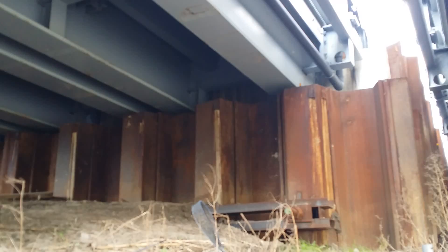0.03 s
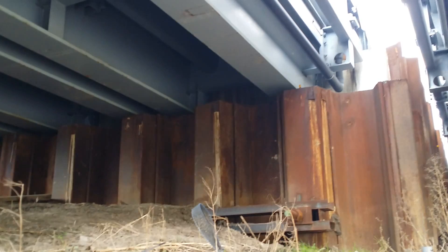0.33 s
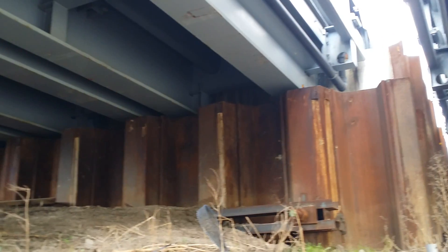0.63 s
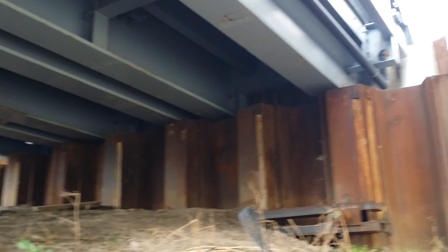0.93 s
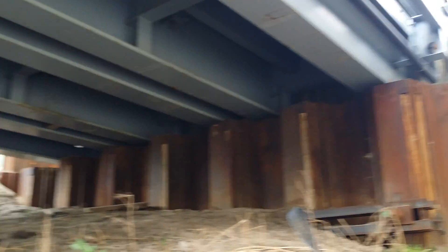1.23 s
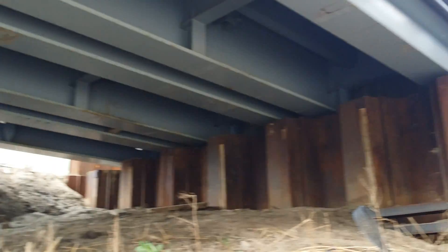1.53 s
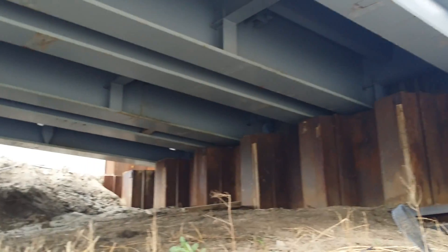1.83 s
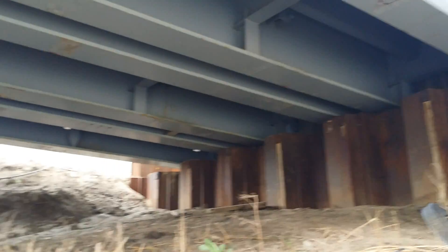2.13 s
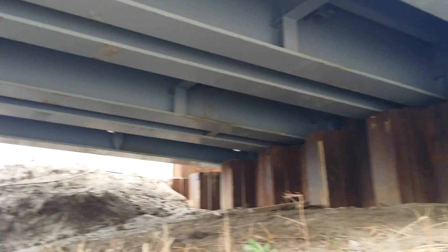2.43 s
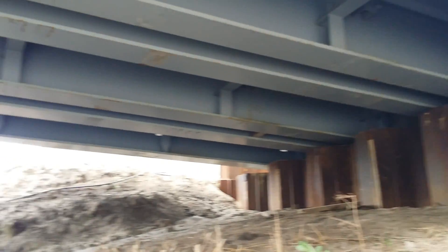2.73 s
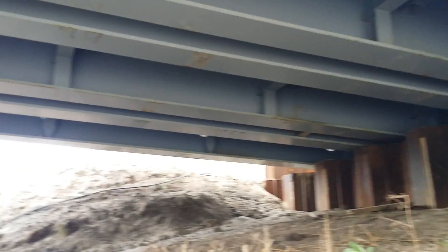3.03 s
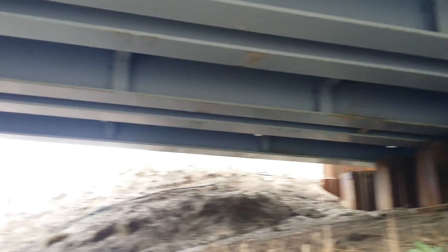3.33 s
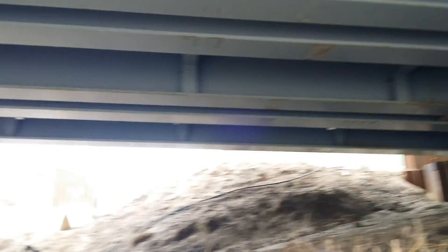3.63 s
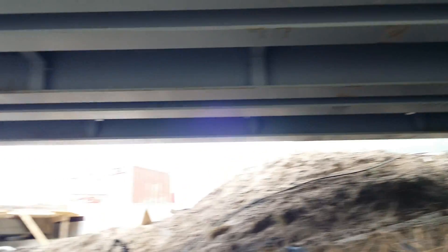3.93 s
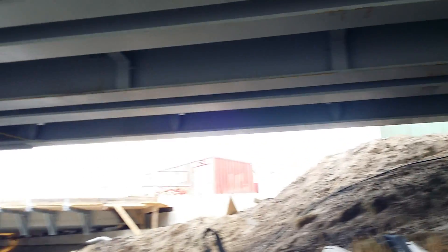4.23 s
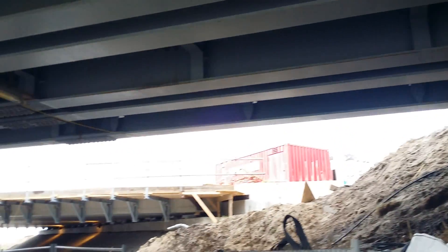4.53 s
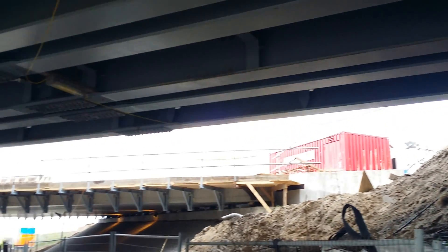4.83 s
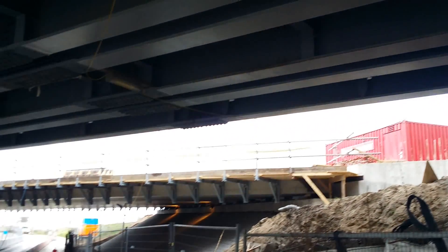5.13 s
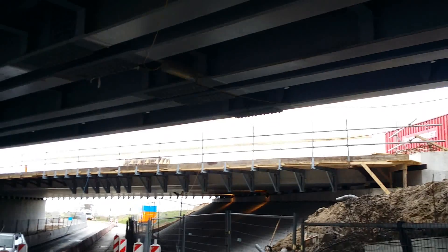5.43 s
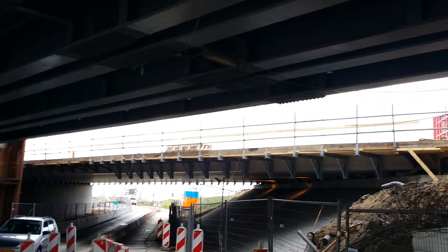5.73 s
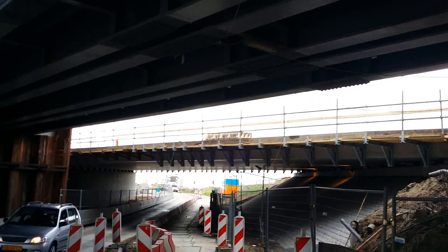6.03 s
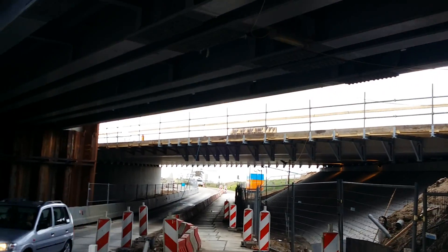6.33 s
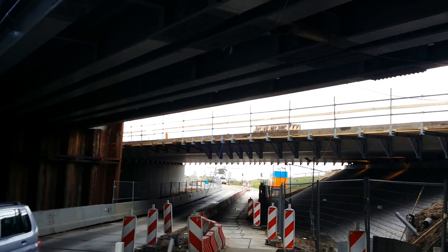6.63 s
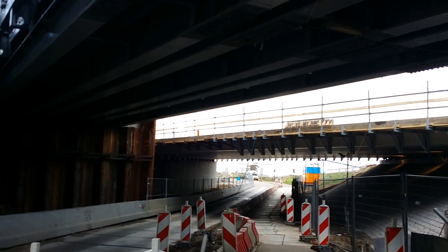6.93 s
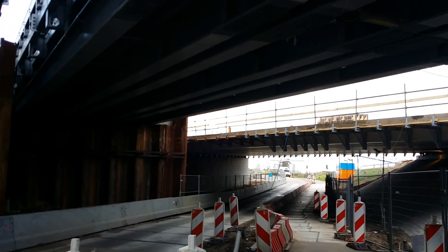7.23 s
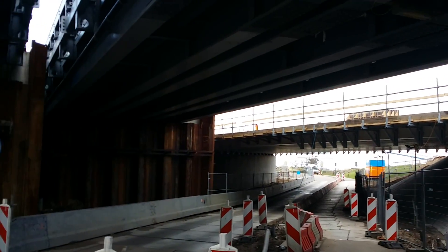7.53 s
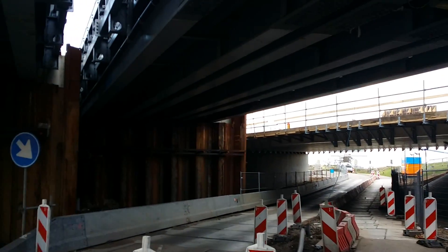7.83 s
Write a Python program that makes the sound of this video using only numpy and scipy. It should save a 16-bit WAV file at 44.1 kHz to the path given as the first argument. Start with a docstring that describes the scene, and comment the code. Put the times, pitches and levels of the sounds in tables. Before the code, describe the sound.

Heard outdoors from under a steel bridge, vehicles roll overhead with a low boom and roar that dies away. In the lull there is distant traffic on the left, a couple of taps on the microphone and puffs of wind. A second wave arrives with a ringing rattle from the bridge joint. Then a car passes close by on the road below, tyres hissing and humming, clanking over a loose steel plate with front and rear wheels.

```python
"""Under a steel road bridge

Overhead, vehicles roll across in two waves with a lull between; the deck booms and roars and its joint rattles.
A car passes about 7 m away on the gritty road below and clanks over a loose steel plate, front axle then rear,
and the underpass rings. In the lull a far road is heard off to the right, wind puffs at the two microphone
ports, something taps the housing and a few small things tick close by."""
import sys
import numpy as np
from scipy import signal
from scipy.fft import rfft, irfft, next_fast_len
from scipy.io import wavfile
from scipy.ndimage import uniform_filter1d, minimum_filter1d

SR = 44100
rng = np.random.default_rng(int(sys.argv[2]) if len(sys.argv) > 2 else 0)


def wav_record(signal):
    """Record a signal, one row per channel, as 16-bit PCM in the file named by sys.argv[1]."""
    frames = np.transpose(np.atleast_2d(signal))
    bounded = np.clip(frames, -1, 1)
    # unit amplitude maps onto the largest positive 16-bit level
    quanta = np.round(bounded * 32767).astype(np.int16)
    wavfile.write(sys.argv[1], SR, quanta)


N = 355887
TIME = np.arange(N) / SR
FFT_SIZE = next_fast_len(N, real=True)
FREQ = np.maximum(np.arange(FFT_SIZE // 2 + 1) * SR / FFT_SIZE, 1)

# The deck's spectrum, heard from underneath: frequency_hz, relative_db
DECK_SPECTRUM = [(16, -57), (28, -20), (40, -14.5), (60, -14.5), (81, -11.5), (102, -2.5), (134, -0.5),
                 (183, 0), (316, -4.5), (408, -3), (558, -1), (1060, -1.5), (1270, -2.5), (1740, -9),
                 (2420, -28), (3000, -30.5), (3900, -69), (6600, -120)]
# Girder resonances and the hollows between them: frequency_hz, width_hz, lift_db
GIRDER_RESONANCES = [(43.7, 15, 2), (95.2, 5.8, 8.5), (130.7, 13, 2.5), (154.3, 7, 2.5), (179, 12.5, -3.5),
                     (226, 10, 2), (279.2, 16.4, 5), (318, 33, 6.5), (380, 11, 2), (493, 260, -1.5),
                     (548, 9.3, 4.5), (1083, 20, 3.5), (2000, 690, 1.5)]
# Sound from the open end of the underpass reaches the left port first: frequency_hz, lead_rad
LEFT_PORT_LEAD = [(100, 0), (300, .12), (600, .3), (900, .35), (1200, 0)]
# Bands of girder boom, plate roar and tyre howl: low_hz, high_hz
DECK_BANDS = [(40, 180), (180, 600), (700, 2000)]

def deck(boom_db, roar_db, howl_db):
    """Rolling tyres shake the deck plates and the girders above the microphone."""
    lift_db = sum(db / (1 + (2 * (FREQ - hz) / width) ** 2) for hz, width, db in GIRDER_RESONANCES)
    steel = colour(DECK_SPECTRUM) * from_db(lift_db) * crowded_modes(spacing_hz=11, depth_db=1.16)
    lead = np.exp(1j * at_hz(LEFT_PORT_LEAD, FREQ) * np.array([[1], [0]]))
    pan_db = at_hz([(100, 0.5), (400, 0.5), (1100, -0.47), (2500, -2.0)], FREQ)
    heard = diffuse() * steel * lead * from_db([pan_db / 2, -pan_db / 2])
    jolts = from_db(.5 * drift(per_s=28))   # uneven plates jolt all bands at once
    levels_db = [boom_db, roar_db, howl_db]
    return jolts * follow_levels(heard, DECK_BANDS, levels_db, flutter_db=0.02, flutter_per_s=28)


# Traffic overhead: arrival_s, overhead_s, boom_db, roar_db, howl_db, hiss_db, spray_db
DECK_TRAFFIC = [(0.10, 1.09, -20, -19, -20, -41, -57.5), (1.14, 0.27, -40, -35, -39, -46, -60.5),
                (1.161, 0.98, -32, -15.5, -24.5, -47, -66), (4.532, 0.82, -20.5, -20.5, -18, -38.5, -58),
                (5.05, 0.42, -40, -22.5, -21.5, -58, -79), (5.48, 1.73, -27.5, -20, -21.5, -63.5, -83),
                (7.28, 1.24, -23, -19.5, -22, -51, -72)]
# The next four each list: boom, roar, howl, hiss, spray
ABUTMENT_LOSS_DB = [15, 11.5, 20.2, 18, 6.1]   # the abutment screens a vehicle until it is on the deck
ENTRY_RISE_S = [0.033, 0.21, 0.091, 0.033, 0.04]   # time to come clear of the abutment
ROLL_AWAY_DB_PER_S = [1.5, 0.2, 1.64, 5.2, 5.2]   # fall while still overhead
OFF_DECK_DB_PER_S = [4.7, 11.7, 35.5, 79, 120]   # the low steel rings on longest

def crossing_levels():
    """Boom, roar, howl, hiss and spray in dB: each vehicle nears, bursts onto the deck and rolls away."""
    stages = [ENTRY_RISE_S, ABUTMENT_LOSS_DB, ROLL_AWAY_DB_PER_S, OFF_DECK_DB_PER_S]
    rise_s, screened_db, sag, release = np.array(stages)[:, :, None]
    approach_db_per_s = 19.5
    steps, levels = TIME[::64], []
    for arrival_s, overhead_s, *full_db in DECK_TRAFFIC:
        age = steps - arrival_s
        nearing = approach_db_per_s * np.maximum(-age, 0) + screened_db * np.clip(1 - age / rise_s, 0, 1)
        leaving = sag * np.clip(age, 0, overhead_s) + release * np.maximum(age - overhead_s, 0)
        levels.append(np.array(full_db)[:, None] - nearing - leaving)
    return [np.interp(TIME, steps, level) for level in power_sum_db(*levels)]


# Heavy axles overhead: start_s, length_s, boom_db, roar_db
AXLE_LOADS = [(0.447, 0.78, -19, -23.5), (1.19, 0.24, -30, -23), (2.056, 0.22, -21, -46),
              (2.397, 0.49, -25.5, -32), (4.54, 0.16, -18, -28), (4.702, 0.38, -15, -40),
              (5.17, 0.14, -32, -40.5), (5.52, 0.29, -31, -24), (5.935, 0.4, -22, -33),
              (6.465, 0.14, -19, -36.5), (7.11, 0.22, -20, -38), (7.5, 0.12, -32, -35)]

def heave_levels(edge_s=0.086):
    """Extra boom and roar in dB while heavy axles make the girders heave."""
    swells = 0
    for start_s, length_s, *levels_db in AXLE_LOADS:
        inside_s = np.minimum(TIME - start_s, start_s + length_s - TIME)
        swells = swells + from_db(levels_db)[:, None] * np.clip(inside_s / edge_s, 0, 1)
    return 20 * np.log10(swells + 1e-9)


# Axles reach the deck's expansion joint, up and a little left: start_s, level_db
JOINT_AXLES = [(4.567, -30), (4.68, -31)]
# The joint's modes: pitch_hz, relative_db, t60_s
JOINT_MODES = [(1570, 2, .9), (1850, -2, .8), (1995, 0, .7), (2690, -6, .5), (3080, -7, .6),
               (3297, -4, 1.2), (3520, -11, .5), (3726, -14, .6), (4264, -12, .8), (4515, -10, .6),
               (4790, -15, .6), (5355, -13, .7)]

def expansion_joint(rattle_db=1.5, rattle_t60_s=1.6, rattle_hz=(1550, 2560), slap_db=6):
    """Soft tyres slap the joint and push it into ringing; its many small parts chatter on."""
    out, age = np.zeros((2, N)), TIME[:SR]
    for start_s, level_db in JOINT_AXLES:
        chatter = unit_rms(butter(rng.standard_normal((2, SR)), rattle_hz, "band"))
        rattle = chatter * from_db(rattle_db - 60 * age / rattle_t60_s)
        ringing = rattle + struck_steel(JOINT_MODES, scatter_db=1.5)
        add(out, start_s, from_db(level_db) * pan(2.9) * ringing * (1 - np.exp(-age / 0.012)))
        add(out, start_s, from_db(level_db + slap_db) * crack(hz=1300, t60_s=0.39, spread=1.53))
    return out


# Wheels on the loose plate in the road below:
# start_s, crack_db, crack_hz, spread_ratio, pan_db, clang_db, ring_db, ring_low_cut_hz
PLATE_HITS = [(6.303, -14, 5400, 1.24, 2.5, -12, -17.5, 1930), (6.475, -34, 8200, 1.3, -2, -45, -46, 4500),
              (6.490, -31, 4800, 1.3, 2, -38, -21.5, 2800), (6.510, -17.5, 5500, 1.65, 1, -16, -19, 1970),
              (6.646, -22, 7940, 1.3, -5, -30, -18, 4530), (6.666, -30, 10500, 1.4, -8, -40, -16, 3680),
              (6.853, -27, 8500, 1.7, 1, -27, -16.5, 3700), (6.890, -28, 7500, 1.3, -8, -34, -22, 3440)]
# The plate's clang, choked as the tyre presses it down: pitch_hz, relative_db, t60_s
CLANG_MODES = [(4080, -6, .03), (4880, -1, .025), (5520, 0, .03), (6350, -3, .035), (7700, -9, .04),
               (8950, -11, .04)]
# The plate's longer ring: pitch_hz, relative_db, t60_s
PLATE_MODES = [(3010, -4, .42), (4264, -1, .45), (5033, -3, .5), (5351, -2, .45), (5550, 0, .5),
               (5812, -1, .5), (6002, 0, .45), (6354, -1, .5), (6755, -3, .45), (7241, -4, .3),
               (8210, -5, .4), (8578, -5, .4), (9320, -2, .45), (9687, -6, .45), (11190, -10, .3),
               (12440, -11, .2)]
# The wash between the underpass walls: frequency_hz, relative_db
WASH_SPECTRUM = [(1500, 7.5), (3000, -5), (4300, -6), (6000, -5.5), (7000, -8), (9200, -7.5),
                 (10500, -12.5), (13000, -14.5), (15500, -26)]
# How long that wash lasts: frequency_hz, t60_s
WASH_DECAY = [(2000, 0.58), (5000, 0.81), (9000, 0.56), (14000, 0.37)]

def plate_clanks(modes_db=-21.5):
    """Each wheel slaps the plate: a crack, a short clang, ringing modes and a wash off the walls."""
    wash = diffuse() * colour(WASH_SPECTRUM) * crowded_modes(spacing_hz=30, depth_db=1.7)
    bands = list(octaves(wash / np.std(to_time(wash)), WASH_DECAY[0][0], WASH_DECAY[-1][0]))
    out, age = np.zeros((2, N)), TIME[:SR]
    for k, hit in enumerate(PLATE_HITS):
        start_s, crack_db, crack_hz, spread, pan_db, clang_db, ring_db, low_cut_hz = hit
        stretch = slice(k * SR // 2, k * SR // 2 + SR)
        tail = sum(band[:, stretch] * from_db(-60 * age / at_hz(WASH_DECAY, hz)) for hz, band in bands)
        modes = from_db(modes_db) * struck_steel(PLATE_MODES, scatter_db=2.5)
        ring = (tail + modes) * (1 - np.exp(-age / 0.0013))   # reflections build up
        add(out, start_s, from_db(ring_db) * butter(ring, low_cut_hz, "high", order=3))
        add(out, start_s, from_db(clang_db) * pan(pan_db) * struck_steel(CLANG_MODES, scatter_db=1.5))
        add(out, start_s, from_db(crack_db) * pan(pan_db) * crack(crack_hz, t60_s=.035, spread=spread))
    return out


# The tread note of the car below, a little to the right: time_s, level_db, pitch_hz
TREAD_NOTE = [(5.599, -67, 868.6), (6.28, -34, 869.5), (6.44, -18.5, 843.6), (6.6, -23.5, 784.5),
              (6.95, -18, 735), (7.251, -29, 720), (8.05, -26.5, 710.2)]

def tyre_sing(width_hz=204, rasp_db=-6, rasp_hz=(940, 1450)):
    """The tread pumps air in one resonance that sinks as the car goes by, with a rasp above it."""
    level_db, pitch_hz = in_time(TREAD_NOTE)
    air, centre_hz = diffuse(), np.mean(np.array(TREAD_NOTE)[:, 2])
    tread = air / np.hypot(1, (2 * (FREQ - centre_hz) / width_hz) ** 2)
    glide_rad = 2 * np.pi * np.cumsum(pitch_hz - centre_hz) / SR
    note = unit_rms(to_time(tread) * np.cos(glide_rad) + to_time(1j * tread) * np.sin(glide_rad))
    rasp = from_db(rasp_db) * unit_rms(butter(to_time(air), rasp_hz, "band", order=3))
    return from_db(level_db) * (TIME > TREAD_NOTE[0][0]) * pan(-1.8) * (note + rasp)


def car_nearness_db(lag_s, pass_s=6.98, speed_m_per_s=4.83, distance_m=6.94, fall_db_per_decade=33.5):
    """Level of the car below, relative to its closest point to the microphone."""
    along_m = speed_m_per_s * (TIME - pass_s - lag_s)
    return -fall_db_per_decade * np.log10(np.hypot(1, along_m / distance_m))


# Tyre hiss as it fills the underpass: frequency_hz, relative_db
HISS_SPECTRUM = [(1290, 4), (2200, -1), (3390, -7.5), (6020, -13.5), (7320, -20), (8560, -21),
                 (10400, -30.5), (14300, -39.5), (15600, -56)]
# Bands of tread hiss and spray: low_hz, high_hz
HISS_BANDS = [(2800, 7000), (9000, 15000)]

def tyre_hiss(deck_hiss_db, deck_spray_db, car_hiss_db=-39, car_spray_db=-53.5):
    """Tread noise and trailing spray from the deck and the car below, scattered by the steel walls."""
    heard = diffuse() * colour(HISS_SPECTRUM) * crowded_modes(spacing_hz=24.7, depth_db=0.8)
    hiss_db = power_sum_db(deck_hiss_db, car_hiss_db + car_nearness_db(lag_s=0))
    spray_db = power_sum_db(deck_spray_db, car_spray_db + car_nearness_db(lag_s=0.35))
    hiss = follow_levels(heard, HISS_BANDS, [hiss_db, spray_db], flutter_db=1.5, flutter_per_s=25)
    return pan(1.0) * hiss


def grit(peak_snaps_per_s=160, gain_db=-39, size_spread_db=4, band_hz=(6500, 13000)):
    """Tiny stones snap in the tread, most often just after the car passes; the walls scatter them."""
    nearness = from_db(car_nearness_db(lag_s=0.56))
    snapped = rng.random(N) < peak_snaps_per_s * nearness ** 2 / SR
    sizes = from_db(size_spread_db * np.minimum(rng.exponential(1, N), 4))
    scatter = rng.standard_normal((2, SR // 100)) * from_db(-60 * TIME[:SR // 100] / 0.009)
    snaps = signal.fftconvolve([snapped * sizes * nearness], scatter / np.std(scatter) / 10, axes=1)
    return from_db(gain_db) * butter(snaps[:, :N], band_hz, "band")


# Wind right on the microphone: start_s, length_s, level_db, top_hz, port (0 left, 1 right)
WIND_PUFFS = [(3.276, 0.014, -12.5, 340, 1), (3.312, 0.045, -20, 358, 1), (3.545, 0.028, -17, 175, 1),
              (3.571, 0.045, -24, 251, 1), (3.781, 0.22, -32, 260, 1), (4.102, 0.051, -12, 517, 0),
              (4.173, 0.02, -12.5, 740, 0), (4.195, 0.021, -11.5, 860, 0), (4.212, 0.029, -14.5, 200, 0),
              (4.363, 0.021, -15, 328, 0), (4.373, 0.017, -18, 396, 1), (4.391, 0.035, -23, 325, 0),
              (4.552, 0.052, -14.5, 220, 0), (5.243, 0.4, -27, 157, 0), (6.169, 0.17, -17.5, 149, 0),
              (7.15, 1, -25, 162, 0)]

def wind(eddy_hz=(55, 173)):
    """An eddy hits one port with a lumpy thud or a longer flutter; big slow eddies push hardest."""
    out = np.zeros((2, N))
    for start_s, length_s, level_db, top_hz, port in WIND_PUFFS:
        span = round(length_s * SR)
        swirl = butter(rng.standard_normal(SR // 4 + span), eddy_hz, "band", order=1)
        eddy = butter(butter(swirl, top_hz, "low"), 61, "high")[-span:]
        puff = unit_rms(eddy * signal.windows.tukey(span, .4))
        add(out[round(port)], start_s, from_db(level_db) * puff)
    return out


# Taps on the microphone housing: start_s, body_gain_db, body_top_hz, edge_gain_db
HOUSING_TAPS = [(2.5355, 5.5, 2500, -15), (2.5991, -2, 4500, -17), (4.385, -12, 4000, -22)]

def taps(body_low_hz=400, edge_hz=9000):
    """Something touches the housing at the right port: one pulse with a dull body and a hard edge."""
    out, pulse = np.zeros((2, N)), signal.unit_impulse(SR // 50)
    for start_s, body_db, top_hz, edge_db in HOUSING_TAPS:
        body = butter(butter(pulse, top_hz, "low"), body_low_hz, "high")
        edge = butter(pulse, edge_hz, "high")
        add(out[1], start_s, from_db(body_db) * body + from_db(edge_db) * edge)
    return out


# Ticks near the microphone: start_s, level_db, pitch_hz, t60_s, pan_db, spread_ratio
NEAR_TICKS = [(3.726, -45, 5400, .01, 10, 1.25), (4.111, -33, 2300, .03, 2, 1.4),
              (4.322, -23.5, 2100, .018, 2, 1.35), (5.562, -41, 7500, .008, 0, 1.7),
              (7.188, -33, 6500, .04, -3, 1.6), (7.690, -41, 8500, .04, 0, 1.4),
              (7.735, -41, 8000, .06, 2, 1.4)]

def ticks():
    """Small dry ticks close by."""
    out = np.zeros((2, N))
    for start_s, level_db, hz, t60_s, pan_db, spread in NEAR_TICKS:
        add(out, start_s, from_db(level_db) * pan(pan_db) * crack(hz, t60_s, spread))
    return out


# A road far off to the right: frequency_hz, relative_db
FAR_ROAD_SPECTRUM = [(40, 0), (100, 5), (250, -20), (420, -19), (750, -8), (1050, -1), (1300, -10),
                     (1650, -5), (1950, -12.5), (2400, -35), (2900, -21), (6000, -26), (7500, -43),
                     (15000, -50)]
# Its swell in the lull: time_s, level_db
FAR_ROAD_LEVEL = [(2.5, -37.5), (3.3, -34), (4.0, -31.5), (4.5, -35)]

def far_road(right_lag_s=0.00045):
    """Steady traffic reaches the right port a little late; its treble comes only by reflection."""
    lag = np.exp(-2j * np.pi * FREQ * right_lag_s * np.array([[0], [1]]))
    direct = rfft(rng.standard_normal(FFT_SIZE)) * lag / np.hypot(1, (FREQ / 3500) ** 2)
    pan_db = at_hz([(300, -8.5), (1500, -2.0), (4000, -2.5), (8000, 24.0)], FREQ)
    heard = (direct + 0.48 * diffuse()) * colour(FAR_ROAD_SPECTRUM) * from_db([pan_db / 2, -pan_db / 2])
    return from_db(in_time(FAR_ROAD_LEVEL)[0]) * unit_rms(to_time(heard))


# How alike the two ports hear sound from all sides: frequency_hz, correlation
PORT_CORRELATION = [(30, -0.03), (100, 0.95), (300, 0.88), (600, 0.7), (900, 0.18), (1300, -0.44),
                    (1850, 0.22), (2700, 0.0054), (3500, 0.048), (4500, -0.058), (15000, 0.035)]

def diffuse():
    """Spectrum of noise from all sides, as two spaced ports pick it up."""
    mid, side = rfft(rng.standard_normal((2, FFT_SIZE)))
    alike = np.clip(at_hz(PORT_CORRELATION, FREQ), -1, 1)
    return np.sqrt(1 + alike) * mid + np.sqrt(1 - alike) * side * [[1], [-1]]


def crack(hz, t60_s, spread, contact_s=.004, echo_s=.0075, echo_db=-9):
    """A contact: a brief crunch in a broad, damped resonance, then its echo off the ground."""
    age = TIME[:SR // 8]
    bursts = butter(rng.standard_normal((2, 2, len(age))), [hz / spread, hz * spread], "band")
    direct, echo = unit_rms(bursts) * from_db(-60 * np.maximum(age - contact_s, 0) / t60_s)
    add(direct, echo_s, from_db(echo_db) * echo)
    return direct


def struck_steel(modes, scatter_db):
    """One second of ringing steel; every blow reaches each mode and port with its own strength."""
    hz, mode_db, t60_s = np.transpose(modes)[:, :, None]
    age = TIME[:SR]
    strength = from_db(mode_db + scatter_db * rng.standard_normal((2, len(hz), 1)))
    turns = hz * age + rng.random(strength.shape)
    return np.sum(strength * np.sin(2 * np.pi * turns) * from_db(-60 * age / t60_s), axis=1)


def crowded_modes(spacing_hz, depth_db):
    """The countless small resonances of steelwork ripple its response."""
    ripple = rng.standard_normal(4096)
    return from_db(depth_db * np.interp(FREQ / spacing_hz, np.arange(len(ripple)), ripple))


def follow_levels(spectrum, zones, levels_db, flutter_db, flutter_per_s):
    """Each frequency zone of a noise follows its level curve; the frequencies between them blend."""
    power = np.abs(spectrum[0] + spectrum[1]) ** 2 / (2 * FFT_SIZE ** 2)
    own_db = [10 * np.log10(power[(FREQ > low) & (FREQ < high)].sum()) for low, high in zones]
    lifts_db = np.array(levels_db) - np.array(own_db)[:, None]
    centres, out = np.sqrt(np.prod(zones, axis=1)), 0
    for hz, band in octaves(spectrum, centres[0], centres[-1]):
        shares = [np.interp(np.log(hz), np.log(centres), row) for row in np.eye(len(zones))]
        out = out + band * from_db(shares @ lifts_db + flutter_db * drift(flutter_per_s))
    return out


def octaves(spectrum, low_hz, high_hz):
    """Split into overlapping bands about an octave wide that sum to the whole."""
    centres = np.geomspace(low_hz, high_hz, 2 + int(np.log2(high_hz / low_hz)))
    for hz, share in zip(centres, np.eye(len(centres))):
        yield hz, to_time(spectrum * np.interp(np.log(FREQ), np.log(centres), share))


def colour(points):
    """Gain per frequency, falling 40 dB an octave beyond the table's ends."""
    octaves_above = np.maximum(np.log2(FREQ / points[-1][0]), 0)
    octaves_below = np.maximum(np.log2(points[0][0] / FREQ), 0)
    return from_db(at_hz(points, FREQ) - 40 * (octaves_above + octaves_below))


def drift(per_s):
    """A random curve that turns per_s times a second."""
    knots = rng.standard_normal(1024)
    return np.interp(TIME * per_s, np.arange(len(knots)), knots)


def at_hz(points, hz):
    """Read (frequency_hz, value) rows on a log-frequency axis."""
    frequencies, values = np.transpose(points)
    return np.interp(np.log(hz), np.log(frequencies), values)


def in_time(rows):
    """One curve for each column after time_s, sample by sample."""
    time_s, *columns = np.transpose(rows)
    return [np.interp(TIME, time_s, column) for column in columns]


def butter(x, hz, kind, order=2):
    """Causal Butterworth filter."""
    sections = signal.butter(order, np.clip(hz, 10, .45 * SR), kind, fs=SR, output="sos")
    return signal.sosfilt(sections, x)


def to_time(spectrum):
    """Spectrum to waveform."""
    return irfft(spectrum.astype(np.complex64), FFT_SIZE)[..., :N]


def from_db(db):
    """Decibels to gain."""
    return np.exp(np.asarray(db) * (np.log(10) / 20))


def power_sum_db(*levels_db):
    """Level of unrelated sounds heard at once."""
    return 10 * np.log10(sum(from_db(db) ** 2 for db in levels_db) + 1e-12)


def unit_rms(x):
    """Scale to unit rms."""
    return x / np.sqrt(np.mean(x ** 2) + 1e-20)


def pan(db):
    """Channel gains for a left-minus-right difference."""
    return from_db([[db / 2], [-db / 2]])


def add(out, start_s, piece):
    """Mix a short sound in at a time."""
    room = out[..., round(start_s * SR):][..., :piece.shape[-1]]
    room += piece[..., :room.shape[-1]]


def scene():
    """Bridge, roads and wind, heard from under the deck."""
    boom_db, roar_db, howl_db, hiss_db, spray_db = crossing_levels()
    heave_boom_db, heave_roar_db = heave_levels()
    bridge = deck(power_sum_db(boom_db, heave_boom_db), power_sum_db(roar_db, heave_roar_db), howl_db)
    traffic = bridge + expansion_joint() + tyre_hiss(hiss_db, spray_db) + tyre_sing() + plate_clanks()
    return traffic + far_road() + ticks() + taps() + wind() + grit()


def record(dry):
    """The input fades in, a limiter ducks both channels on the highest peaks, the top is cut."""
    open_s, fade_s, stopband_hz = 0.388, 0.29, 16400
    limit_db, release_db_per_s = -.5, 200
    opened = dry * np.interp(TIME, [open_s, open_s + fade_s], [0.045, 1], left=0)
    over_db = np.maximum(20 * np.log10(np.abs(opened).max(axis=0) + 1e-9) - limit_db, 0)
    held_db = np.maximum.accumulate(over_db + release_db_per_s * TIME) - release_db_per_s * TIME
    gain_db = uniform_filter1d(minimum_filter1d(-held_db, size=64), size=64)
    top_cut = signal.cheby2(16, 70, stopband_hz, fs=SR, output="sos")
    return signal.sosfilt(top_cut, opened * from_db(gain_db))


dry = scene()
out = record(dry)
wav_record(out)
```